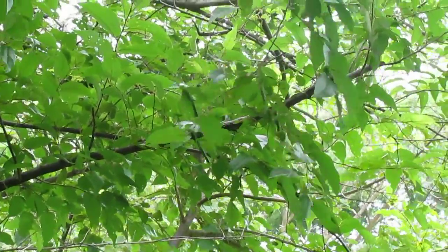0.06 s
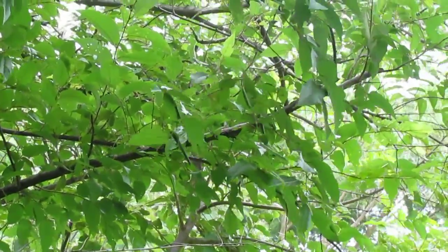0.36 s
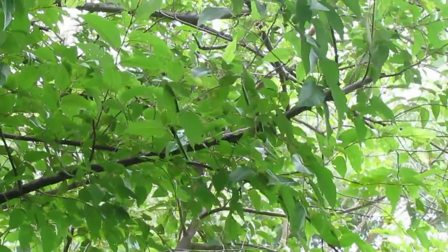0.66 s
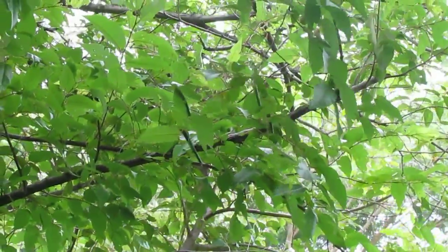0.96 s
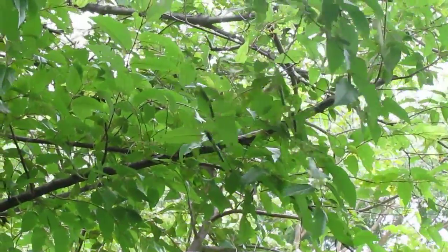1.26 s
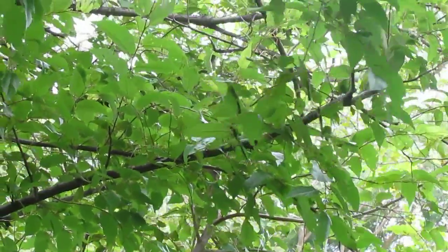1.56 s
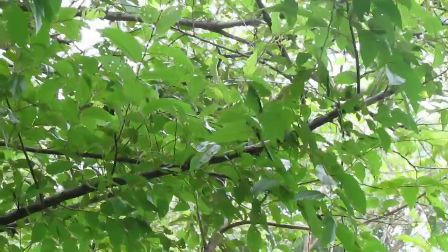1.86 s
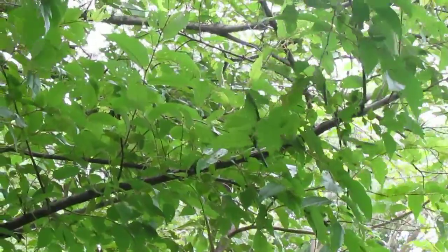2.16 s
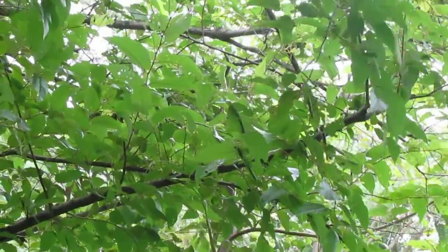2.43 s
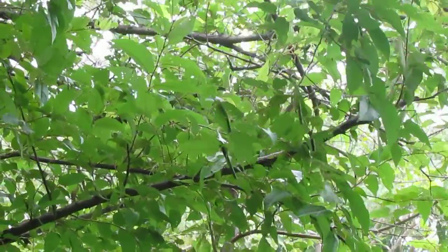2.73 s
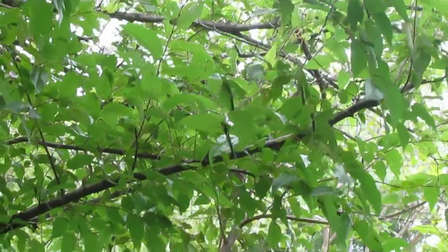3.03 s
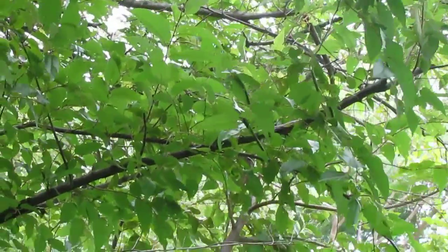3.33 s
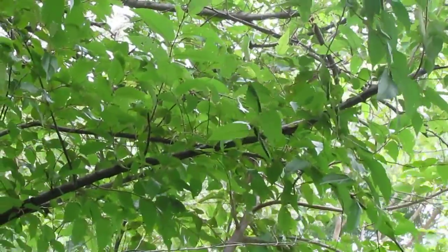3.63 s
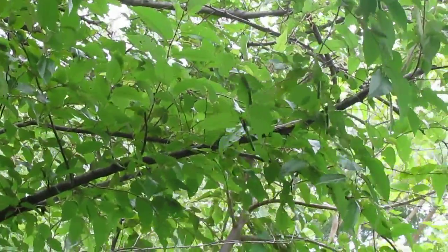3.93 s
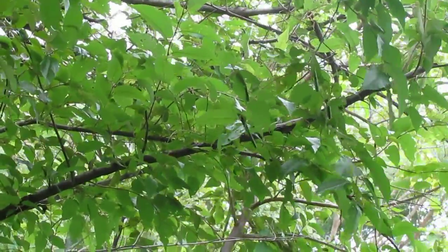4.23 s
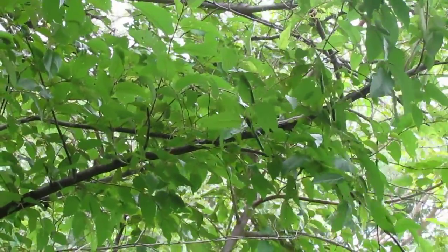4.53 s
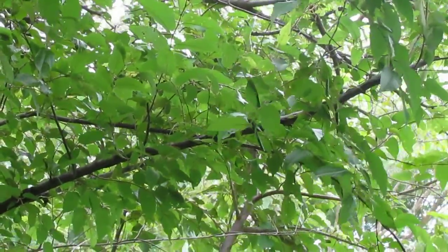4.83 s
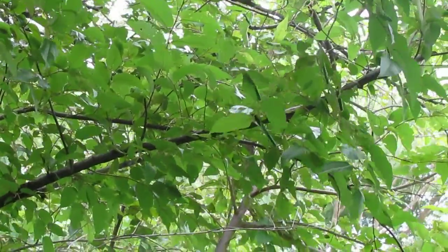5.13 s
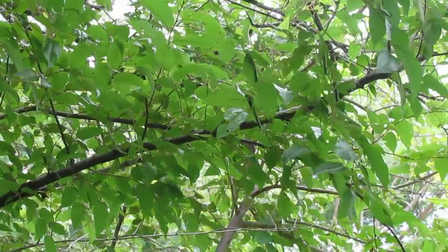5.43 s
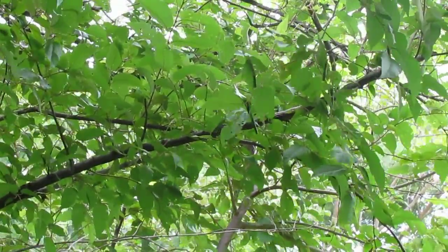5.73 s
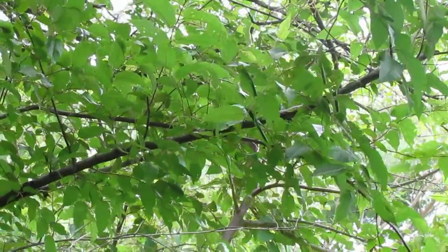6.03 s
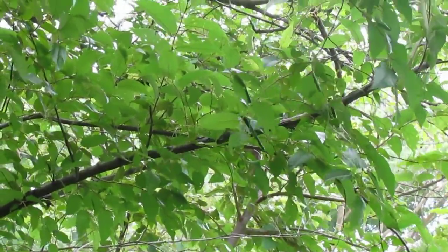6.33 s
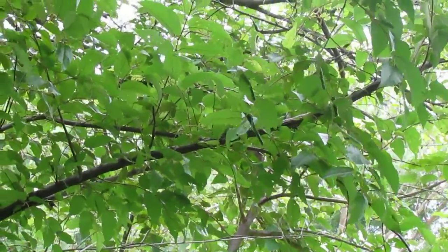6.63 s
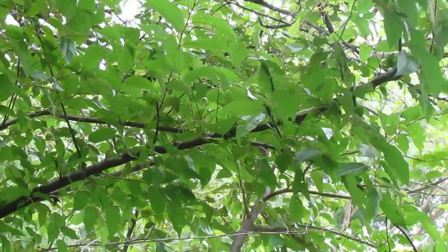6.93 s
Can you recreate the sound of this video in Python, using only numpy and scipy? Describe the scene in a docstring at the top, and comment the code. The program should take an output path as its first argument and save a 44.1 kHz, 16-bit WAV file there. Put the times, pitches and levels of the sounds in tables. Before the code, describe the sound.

Outdoors under trees, a nearby bird scolds in a long, regular run of loud rattling chirps, part whistle and part rasp, easing slightly toward the end. A thin, high cricket sizzle and the soft hiss of the wood lie underneath, along with faint far whistles and low coos. Gusts brush the microphone now and then, buffeting it most about halfway through.

```python
"""A bird scolds from a leafy tree: a long series of harsh notes, each a rattle of short whistled arches
wrapped in rasping air, as puffs of breath snap its syrinx open. The foliage scatters every note.
High above it a bush cricket pulses, file on scraper, over the even hush of the wood.
Light gusts rumble on the microphone ports, and far birds whistle, coo and give one nasal peep."""
import sys
import numpy as np
from scipy import signal
from scipy.fft import rfft, irfft, next_fast_len
from scipy.io import wavfile

SR = 44100
rng = np.random.default_rng(int(sys.argv[2]) if len(sys.argv) > 2 else 0)


def unload_audio(sound):
    """Save the sound as a 16-bit wav file, at the path given as the first command line argument."""
    columns = np.transpose(np.atleast_2d(sound))
    # keep every value between -1 and 1, then stretch to whole-number steps
    steps = np.round(np.clip(columns, -1, 1) * 32767)
    wavfile.write(sys.argv[1], SR, steps.astype(np.int16))


N = 307818
TIME = np.arange(N) / SR


def undb(db):
    """Decibels to gain."""
    return 10 ** (np.asarray(db) / 20)


def unit(x):
    """Scale to rms 1."""
    return x / np.sqrt(np.mean(x ** 2))


def past(t, moment):
    """Time gone by since a moment, zero before it."""
    return np.maximum(t - moment, 0)


def phase_of(hz):
    """Running phase of an oscillator with a moving frequency."""
    return 2 * np.pi * np.cumsum(hz) / SR


def walk(rate, count=N):
    """Smooth random drift with spread near 1, taking `rate` turns a second."""
    knots = rng.standard_normal(count // 4)
    return np.sqrt(3 / 2) * np.interp(np.arange(count) * rate / SR, np.arange(len(knots)), knots)


def over_bins(points, size):
    """Spread (Hz, value) points over the bins of a spectrum."""
    hz, value = np.transpose(points)
    return np.interp(np.log(np.arange(size // 2 + 1) * SR / size + 1), np.log(hz + 1), value)


def colour(x, points):
    """EQ by a curve of (Hz, dB) points."""
    size = next_fast_len(x.shape[-1] + 2048)
    return irfft(rfft(x, size) * undb(over_bins(points, size)), size)[..., :x.shape[-1]]


def pan(x, left_db):
    """Set the left side against the right; negative values lean right."""
    return x * undb(np.array([[left_db], [-left_db]]) / 2)


# Stereo width of diffuse sound. Each row: frequency in Hz, correlation between the two ports.
PORT_LIKENESS = [(50, 0.27), (600, 0.66), (2500, 0.45), (5000, 0.42), (8000, 0), (15000, 0.00039)]

def diffuse(count):
    """Noise from all around, unrelated at the two ports for the shortest waves."""
    size = next_fast_len(count)
    mid, side = rfft(rng.standard_normal((2, size)))
    alike = np.clip(over_bins(PORT_LIKENESS, size), -1, 1)
    mid, side = mid * np.sqrt(1 + alike), side * np.sqrt(1 - alike)
    return unit(irfft([mid + side, mid - side], size)[:, :count])


def scatter(x, t60, build_s):
    """Countless small echoes, as off leaves and trunks, build up and die away."""
    t = TIME[:SR]
    echoes = diffuse(SR) * 1000 ** (-t / t60) * (1 - np.exp(-t / build_s))
    echoes /= np.sqrt(np.sum(echoes ** 2) / 2)
    return signal.fftconvolve(x[None], echoes, axes=1)[:, :N]


def breath(t, swell, held):
    """Envelopes of a note in dB: pressure jumps up, swells, holds, drops, trails off and stops."""
    rise_db_per_s, trail_db_per_s, stop_db_per_s = 345.5, 170, 820
    onset_db, drop_db, drop_s, trail_s = 14, 10, .0293, .074
    attack_db = -rise_db_per_s * past(swell, t) - onset_db * np.minimum(past(-.0035, t) / .002, 1)
    release_db = -drop_db * np.minimum(past(t, held) / drop_s, 1) - trail_db_per_s * past(t, held + drop_s)
    stop_db = -stop_db_per_s * past(t, held + trail_s)
    pressure_db = attack_db + release_db + stop_db
    whistle_db = pressure_db + .51 * attack_db  # it needs full pressure, so its attack is steeper
    # the rasp peaks just after the whistle, sags, outlasts the hold and dies away
    lag_s, hang_s, sag_db_per_s, fall_db_per_s = .019, .041, 58, 190
    rasp_db = attack_db - 3.3 * np.minimum(past(swell + lag_s, t) / lag_s, 1) + .085 * stop_db
    rasp_db -= sag_db_per_s * past(t, swell + lag_s) + fall_db_per_s * past(t, held + hang_s)
    return pressure_db, whistle_db, rasp_db


def note(t, swell, held, pitch_hz, puffs_per_s=95, arch=.15, roughness=.0312, climb_per_s=.448):
    """Whistle, rasp and snap of one note: each puff snaps the syrinx open and arches the pitch."""
    count = len(t)
    pressure_db, whistle_db, rasp_db = breath(t, swell, held)
    cycle = puffs_per_s * (1 + .02 * rng.standard_normal()) * t + .055 * walk(70.5, count)
    opening = .5 + .5 * np.cos(2 * np.pi * cycle)
    sag = arch * (1 - opening) ** 2  # the pitch dips between puffs
    # the membranes tighten with pressure and as the note goes on, and tremble from puff to puff
    tension = 1 + .003 * np.maximum(pressure_db, -45) + climb_per_s * (t - held / 2)
    tension += .0138 * walk(100.3, count)
    phase = phase_of(pitch_hz * (tension - sag + roughness * walk(1500, count)))
    tone = np.sin(phase) + undb(-21.5) * np.sin(2 * phase) + undb(-9.5) * np.sin(3 * phase)
    puffs = (opening ** 2.3 + .2) * undb(1.1 * walk(110.4, count))
    whistle = unit(tone * puffs) * undb(whistle_db)
    # the membranes flutter chaotically as they open; this stays strong in the weak puffs
    since_snap = (cycle + .27) % 1
    flutter = unit(rng.standard_normal(count) * np.exp(-since_snap / .65))
    snap = flutter * undb(np.minimum(pressure_db + 10.5, 0))
    air = rng.standard_normal(count) * (1 + .14 * (2 * opening - 1)) * undb(1.1 * walk(900, count))
    # the beak never opens quite the same way twice
    beak_eq = [(hz, 1.87 * rng.standard_normal()) for hz in range(3000, 13000, 500)]
    rasp = unit(colour(air, beak_eq)) * undb(rasp_db - 5)
    return np.array([whistle, rasp, snap])


# Resonances among the nearest boughs. Each row: centre in Hz, width in Hz, boost in dB.
BOUGH_PEAKS = [(1654, 16, 6.5), (1850, 38, 3.5), (1913, 62, 7), (2130, 105, 7), (2344, 50, 3.5),
               (2626, 35, 3), (3016, 38, 4.5), (3750, 130, 3), (4090, 25, 0.5), (5030, 39, 5.5),
               (5940, 57, 5.5), (6350, 190, 3.5)]

def boughs(x):
    """Echoes off the nearest boughs add up at some pitches and ring on briefly."""
    size = next_fast_len(N + SR)
    hz = np.arange(size // 2 + 1) * SR / size
    gain = 1 + sum((undb(db) - 1) / (1 + 2j * (hz - centre) / width) for centre, width, db in BOUGH_PEAKS)
    return irfft(rfft(x, size) * gain, size)[..., :N]


# EQ of throat and beak on the whistle, the rasp and the membrane snap.
# Each row: frequency in Hz, gain in dB.
WHISTLE_EQ = [(900, -35), (1400, -8), (1700, 14.5), (2200, -1), (2600, 1.5), (3000, -5), (3600, -11),
              (5200, -2), (8000, -7.5), (12000, -35)]
RASP_EQ = [(500, -36), (1000, -4.5), (1350, -7), (1700, 1.5), (2100, 2.5), (2900, 10), (3500, 3),
           (4300, 2.5), (5300, 6.5), (5750, 4.5), (6400, 11), (7200, 4), (10500, 1), (14500, -24)]
SNAP_EQ = [(1000, -26), (1400, -10.5), (1700, 0.5), (2100, 3), (2650, 6.5), (3050, 0), (3600, -15),
           (6000, -10.5), (10000, -10.5), (14000, -34)]
# The scolding. Each row: first puff in seconds, end of the swell and end of the hold in seconds
# after it, crest pitch in Hz, relative level in dB.
SCOLD_NOTES = [(-.098, .03, 0.072, 2665, -18.5), (0.2624, 0.0299, .075, 2616, -18.5),
               (0.6999, 0.045, 0.098, 2631, -16.5), (1.1074, .03, 0.077, 2635, -20),
               (1.5366, 0.0362, 0.092, 2583, -21), (1.9268, 0.033, 0.067, 2593, -18),
               (2.3183, .032, 0.084, 2568, -18.5), (2.673, .034, 0.087, 2533, -20),
               (3.0425, .028, 0.08, 2593, -20.5), (3.4735, .033, 0.09, 2545, -19.5),
               (3.8893, .029, 0.078, 2576, -20), (4.2915, .034, 0.088, 2570, -20.5),
               (4.6519, .025, .077, 2562, -21), (5.0046, 0.041, 0.084, 2534, -21.5),
               (5.3967, .036, 0.092, 2591, -21), (5.7756, .032, 0.079, 2545, -21.5),
               (6.118, .029, 0.069, 2593, -21), (6.48, .028, 0.076, 2604, -23.5)]

def scolding_bird():
    """Harsh notes arrive directly, through the nearby leaves and from the deeper wood."""
    layers = np.zeros((3, N))
    for start, swell, held, pitch_hz, db in SCOLD_NOTES:
        span = (TIME > start - .016) & (TIME < start + .22)
        layers[:, span] += undb(db) * note(TIME[span] - start, swell, held, pitch_hz)
    whistle, air, snap = layers
    voice = boughs(undb(-3) * colour(whistle, WHISTLE_EQ) + undb(-7) * colour(snap, SNAP_EQ))
    rasp = boughs(undb(.58) * colour(air, RASP_EQ))
    # leaves scatter the short waves of the rasp more than the whistle
    leaves = scatter(undb(-.5) * voice + rasp, t60=.19, build_s=.0037)
    wood = scatter(voice + undb(3.5) * rasp, t60=.99, build_s=.017)
    halo = undb(-5) * rasp + undb(-6) * leaves + undb(-21) * wood
    return pan(voice, left_db=-3.5) + pan(halo, left_db=-.9)


# Tone of the cricket's wing. Each row: frequency in Hz, gain in dB.
WING_EQ = [(9000, -22), (10500, -12.5), (11200, -5), (11650, -5), (12300, -7.5), (13200, -9), (14500, -13),
           (16000, -19.5)]
# Fader ride for two spells of song. Each row: time in seconds, level in dB.
CRICKET_LEVELS = [(0, -39), (1.8, -39.5), (3, -42), (4, -42), (4.5, -53.5), (5.65, -55), (5.9, -45),
                  (6.38, -42), (6.45, -56)]

def cricket(strokes_per_s=23, depth=.32):
    """Each wing stroke drags a file over a scraper and rings the wing in a burst of high sizzle."""
    strokes = 1 + depth * np.sin(phase_of(strokes_per_s * (1 + .07 * walk(9.3))))
    # the wing rings at the same pitches on every stroke, giving the sizzle a steady grain
    ring = unit(scatter(rng.standard_normal(N), t60=.03, build_s=.001))
    sizzle = unit(colour(.5 * ring + diffuse(N), WING_EQ))
    level_db = np.interp(TIME, *np.transpose(CRICKET_LEVELS))
    return pan(unit(sizzle * strokes) * undb(level_db), left_db=-2.5)


# Tone of the background bed. Each row: frequency in Hz, gain in dB.
HUSH_EQ = [(18, -46), (30, -1.5), (105, -11.5), (182, -8.5), (341, -7), (546, -9), (656, -7.5), (897, -8.5),
           (1680, -9), (1820, -8.5), (2490, -6.5), (3490, -9), (4190, -9), (10700, -11), (15500, -12.5)]

def woodland(level_db=-43.5):
    """Even hush of distant leaves and insects."""
    hush = unit(colour(diffuse(N), HUSH_EQ))
    return pan(hush * undb(level_db + .5 * walk(3.4)), left_db=-.9)


# Tone of wind on a port. Each row: frequency in Hz, gain in dB.
RUMBLE_EQ = [(10, -26), (32, -1.5), (75, 3), (140, -3), (220, -11), (300, -16.5), (420, -37), (700, -46),
             (1500, -60)]
# Gusts. Each row: start in seconds, hold in seconds, right level in dB, left against right in dB.
GUST_CUES = [(.5, 0.027, -44, -12), (.96, 0.073, -42.5, -6), (1.158, .25, -40.5, -4.5),
             (1.718, .05, -48.5, -14), (2.08, .12, -46.5, -15), (2.319, 0.027, -36, -24),
             (2.473, .25, -31, -12), (2.871, .17, -33.5, -17), (3.195, 0.035, -29.5, -21),
             (3.302, .1, -38.5, -10), (3.712, 0.36, -42.5, -14), (4.408, .06, -49.5, -11),
             (4.71, .04, -49, -16), (5.85, .06, -46, -7), (6.187, 0.048, -44, -13),
             (6.39, 0.028, -48.5, -12)]

def wind(breeze_db=-62.5, lee_db=-7, flutter_db=2.5, rise_db_per_s=400, fall_db_per_s=202):
    """Gusts rise, hold and fall over a light breeze, rumbling on each port; the left is in the lee."""
    power = undb(breeze_db + np.array([[lee_db], [0]]) + 4 * walk(6)) ** 2
    for start, hold, db, left_db in GUST_CUES:
        shape_db = -rise_db_per_s * past(start, TIME) - fall_db_per_s * past(TIME, start + hold)
        power += (undb(db + np.maximum(shape_db, -80)) * undb([[left_db], [0]])) ** 2
    turbulence = [rng.standard_normal(N) * undb(flutter_db * walk(35)) for port in range(2)]
    return np.sqrt(power) * [unit(colour(noise, RUMBLE_EQ)) for noise in turbulence]


# Far whistles. Each row: start and length in seconds, first, middle and last pitch in Hz, level in dB.
WHISTLE_CUES = [(0.363, 0.18, 1830, 1760, 1743, -45.5), (.87, 0.12, 1760, 1870, 2050, -46),
                (1.39, 0.22, 1950, 1700, 1510, -53), (1.679, 0.25, 1690, 1774, 1727, -44),
                (2.53, 0.16, 1800, 1810, 1750, -52)]

def whistling_bird():
    """Thin pure tones fade in and out, each gliding through three pitches."""
    out = np.zeros(N)
    for start, length, first_hz, middle_hz, last_hz, db in WHISTLE_CUES:
        span = (TIME > start) & (TIME < start + length)
        progress = (TIME[span] - start) / length
        glide = np.polyfit([0, .5, 1], [first_hz, middle_hz, last_hz], 2)
        out[span] += undb(db) * np.sin(np.pi * progress) * np.sin(phase_of(np.polyval(glide, progress)))
    return out


# Far coos. Each entry: start in seconds.
COO_STARTS = [.615, 1.752, 2.855, 4.023, 5.147, 6.35]
# Shape of one coo. Each row: share of its length, pitch in Hz, relative level in dB.
COO_SHAPE = [(0, 605, -20), (.25, 638, -7), (.5, 664, -2), (.68, 682, 0), (.9, 681, -1), (1, 690, -14)]

def cooing_bird(length_s=.48, level_db=-53):
    """Soft low tones swell and rise with a slight waver."""
    out = np.zeros(N)
    share, shape_hz, shape_db = np.transpose(COO_SHAPE)
    for start in COO_STARTS:
        span = (TIME > start) & (TIME < start + length_s)
        progress = (TIME[span] - start) / length_s
        hz = np.interp(progress, share, shape_hz) * (1 + .002 * walk(40.4, len(progress)))
        out[span] += undb(level_db + np.interp(progress, share, shape_db)) * np.sin(phase_of(hz))
    return out


# Wind thumps. Each row: time in seconds, swing rate in Hz, left level in dB, right level in dB.
BUFFET_CUES = [(2.691, 90, -30, -45), (2.877, 149, -52, -20.5), (2.989, 194, -55, -27),
               (3.052, 166, -55, -30), (3.198, 123, -52, -24), (3.235, 141, -50, -21),
               (3.303, 190, -55, -29)]

def buffets():
    """The hardest eddies each give the ports one quick swing of pressure."""
    out = np.zeros((2, N))
    for when, hz, left_db, right_db in BUFFET_CUES:
        span = abs(TIME - when) < .03
        turns = (TIME[span] - when) * hz
        swing = 2 * np.tanh(10 * turns) * np.exp(-abs(turns) / .27)
        out[:, span] += undb([[left_db], [right_db]]) * swing
    return out


# Partials of the peep. Each row: harmonic number, level in dB.
PEEP_PARTIALS = [(1, -55), (3, -53), (4, -53)]

def peep(start_s=2.912, length_s=.12, pitch_hz=1322, sag_hz_per_s=220):
    """One far bird call, nasal with strong upper harmonics, sagging slightly in pitch."""
    t = np.clip(TIME - start_s, 0, length_s)
    phase = phase_of(pitch_hz - sag_hz_per_s * t)
    return np.sin(np.pi * t / length_s) * sum(undb(db) * np.sin(k * phase) for k, db in PEEP_PARTIALS)


def scene():
    """Everything heard under the tree; the far birds share one faint echo off the trees."""
    mix = scolding_bird() + cricket() + woodland() + wind() + buffets()
    far_birds = whistling_bird() + cooing_bird() + peep()
    return mix + far_birds + undb(-8) * scatter(far_birds, t60=.5, build_s=.01)


def record(dry):
    """A steep low-pass cuts the top above 15.8 kHz."""
    return signal.sosfilt(signal.ellip(12, .2, 80, 15800, fs=SR, output="sos"), dry)


dry = scene()
out = record(dry)
unload_audio(out)
```